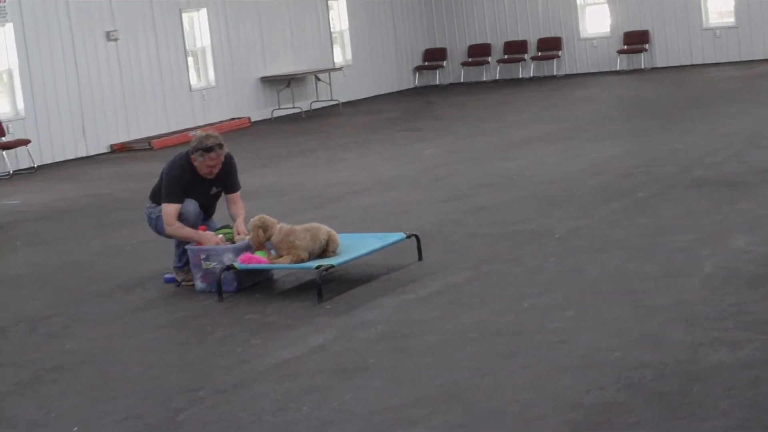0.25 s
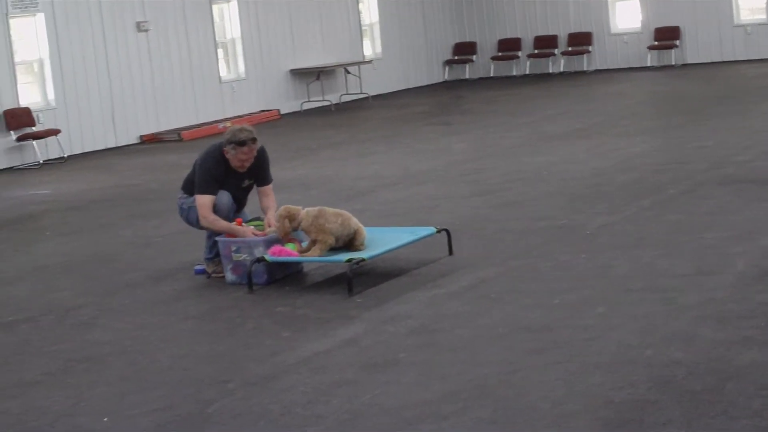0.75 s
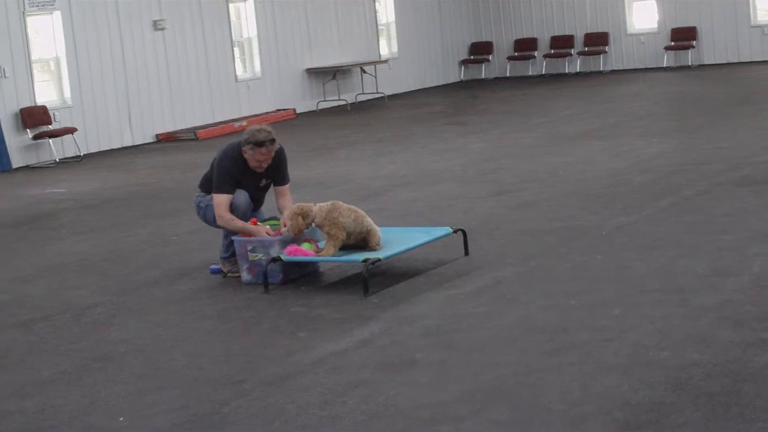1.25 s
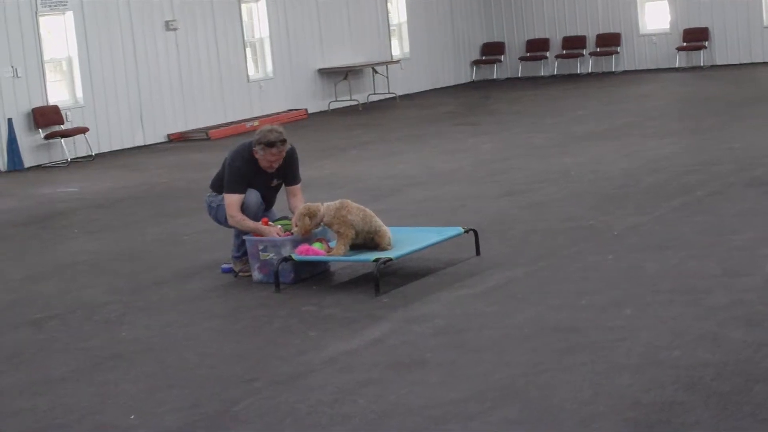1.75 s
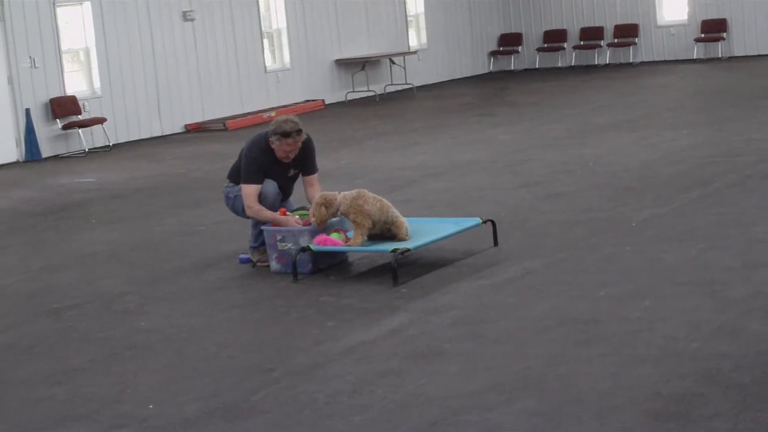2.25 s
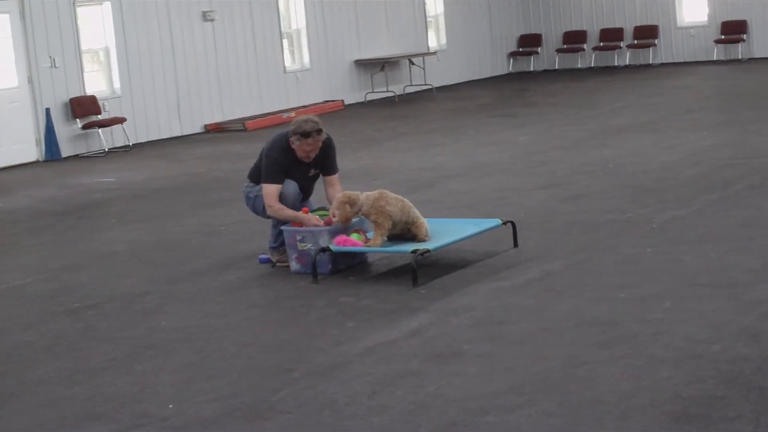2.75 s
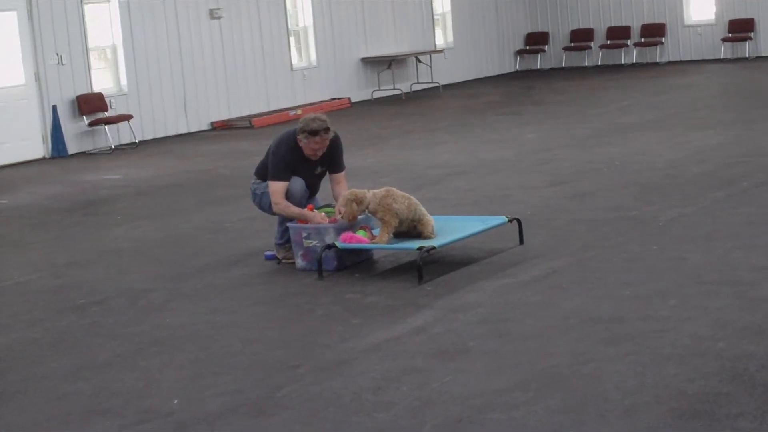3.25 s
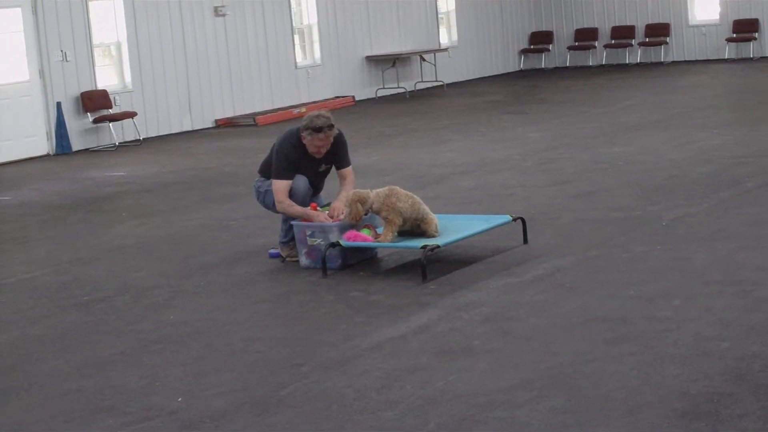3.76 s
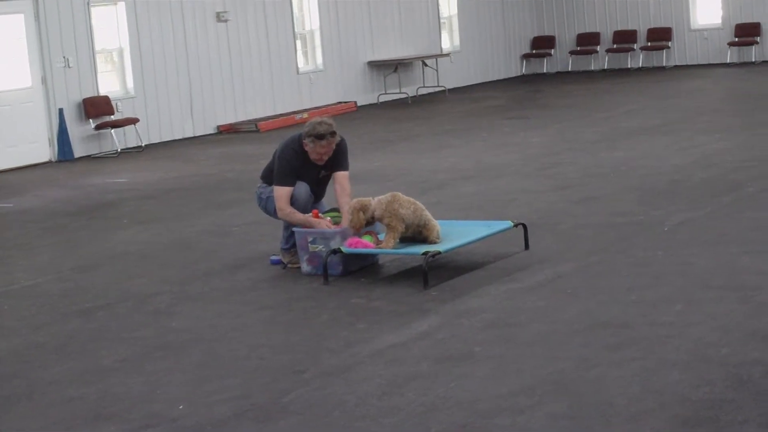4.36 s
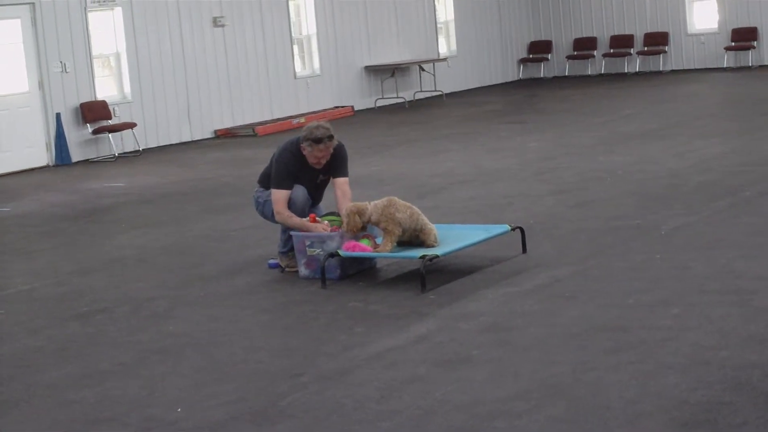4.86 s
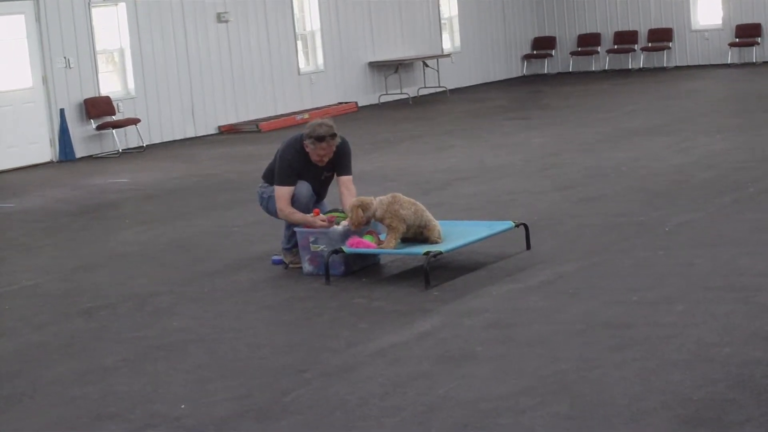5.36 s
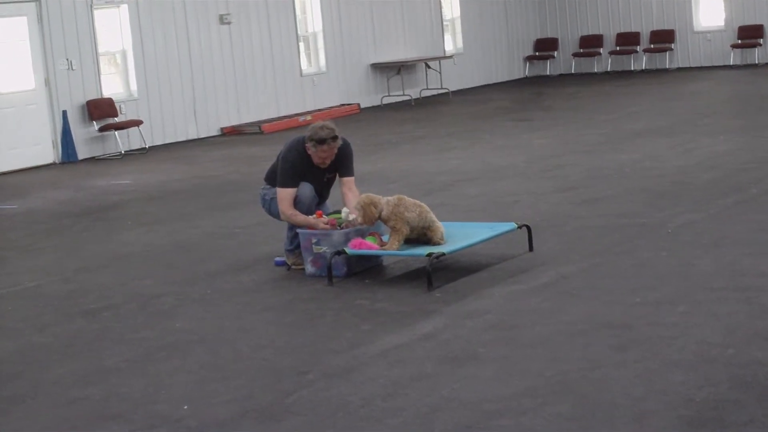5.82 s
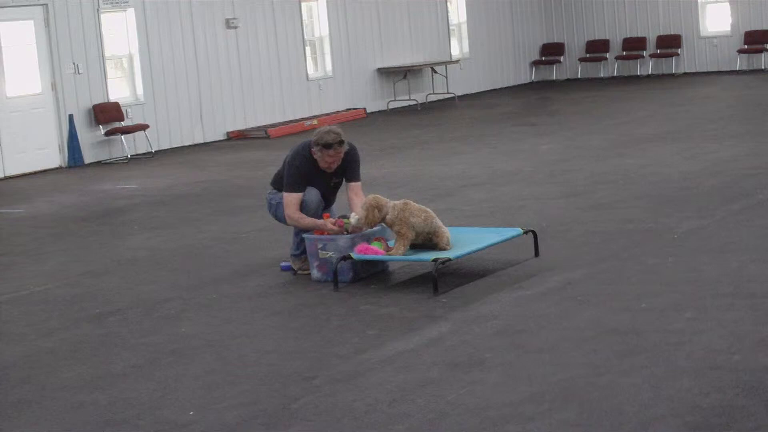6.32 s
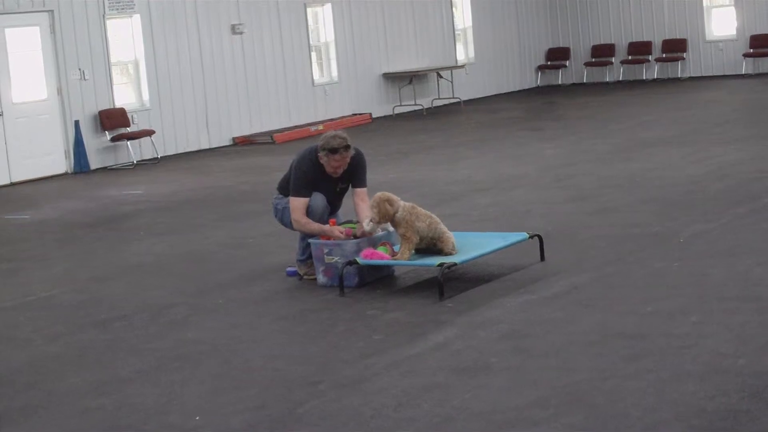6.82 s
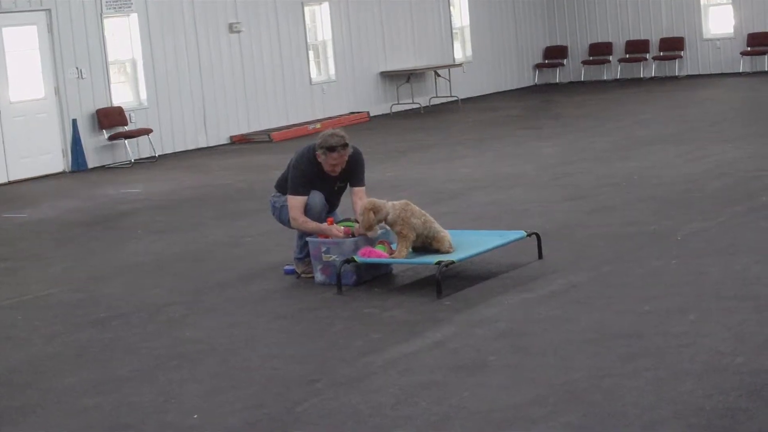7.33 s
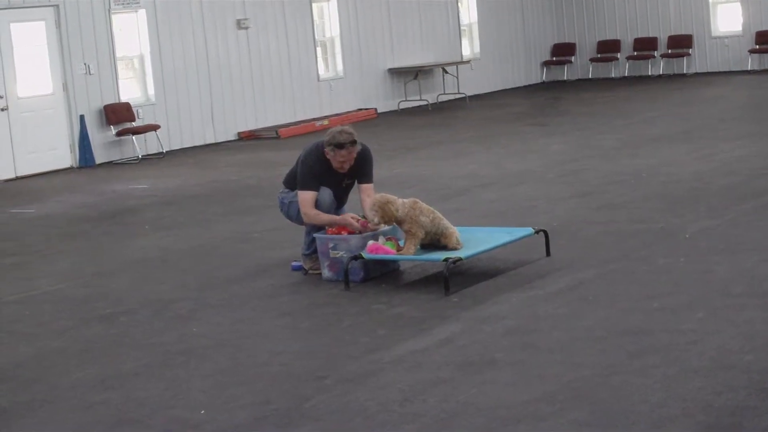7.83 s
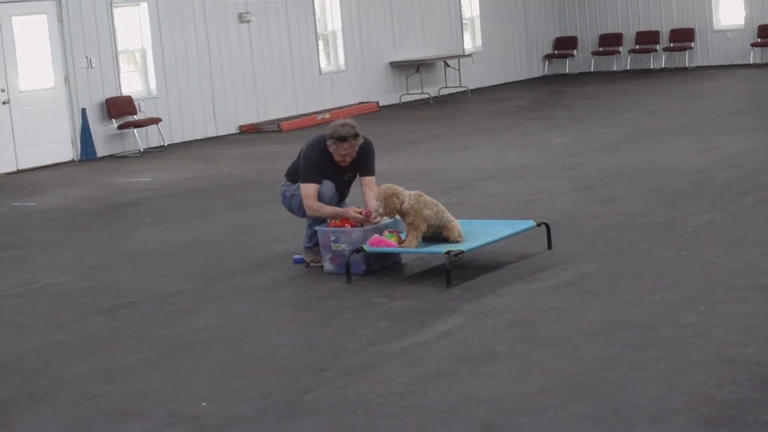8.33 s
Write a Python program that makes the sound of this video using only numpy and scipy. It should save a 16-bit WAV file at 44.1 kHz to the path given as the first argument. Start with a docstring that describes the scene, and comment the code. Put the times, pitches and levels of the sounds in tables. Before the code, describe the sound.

A dog's squeaky toy is squeezed irregularly in an echoing hall. The tail of an earlier squeak opens the scene; weak squeezes only hiss, while hard ones chirp sharply and drop in pitch. A tight group comes in the middle and two more near the end. Muted knocks, cloth rubs, one close tiny click and very faint distant whooshes sit over steady ventilation hum, heard from several metres away.

```python
"""Short reedy squeaks from a rubber toy ring in a large, bare hall, some metres from the microphone.
Hard squeezes make its reed sing harmonics in arches of pitch; soft ones only puff coloured noise,
and faint gliding tones whistle as the toy refills. Shuffles, hollow knocks and one close click join in.
The hall adds early echoes and a long noise tail; whooshes pass far off as gliding bands of noise.
Under it all lie steady low tones of mains and fans, with ventilation noise and equipment hiss."""
import sys
import numpy as np
from scipy import signal
from scipy.fft import rfft, irfft, next_fast_len
from scipy.io import wavfile
from scipy.ndimage import map_coordinates

SR = 44100
rng = np.random.default_rng(int(sys.argv[2]) if len(sys.argv) > 2 else 0)


def log_audio(samples):
    """Write samples as a 16-bit WAV file to the path given in sys.argv[1]."""
    # one column per channel
    frames = np.atleast_2d(samples).T
    # limit to full scale, then quantise
    limited = np.clip(frames, -1, 1)
    pcm = np.round(limited * 32767).astype(np.int16)
    wavfile.write(sys.argv[1], SR, pcm)


N = 378554
LEAD = SR // 4  # samples before time zero, so that an earlier squeak still rings in the hall
TIME = np.arange(-LEAD, N) / SR
TOP_HZ = 15280  # upper band limit


def amp(db):
    """Gain of a level in dB."""
    return 10 ** (np.asarray(db) / 20)


def unit(x):
    """x brought to rms 1."""
    return x / np.sqrt(np.mean(x ** 2) + 1e-20)


def along(points, hz):
    """Values between (Hz, value) points, read along a log frequency axis."""
    point_hz, values = np.transpose(points)
    return np.interp(np.log(hz + 1), np.log(point_hz + 1), values)


def stroke(start, length, rise, fall):
    """Samples that an event spans, the time since its start and its soft ends."""
    at = slice(*np.searchsorted(TIME, [start, start + length]))
    t = TIME[at] - start
    ends = np.clip(t / rise, 0, 1) * np.clip((length - t) / fall, 0, 1)
    return at, t, ends


def arch(t, crest, length, climb, sag, power=2):
    """0 at the crest, climb lower at the start and sag lower at the end."""
    before = np.clip(1 - t / max(crest, 1e-3), 0, 1)
    after = np.clip((t - crest) / (length - crest), 0, 1)
    return -climb * before ** 2 - sag * after ** power


def phase(hz):
    """Phase in radians of a tone whose pitch moves."""
    return 2 * np.pi * np.cumsum(hz) / SR


def wobble(rate):
    """A smooth random curve, rate knots a second."""
    n = len(TIME)
    knots = rng.standard_normal(int(n * rate / SR) + 4)
    return map_coordinates(knots, [np.arange(n) * rate / SR])


def filtered(x, response):
    """x times a complex response of frequency."""
    m = next_fast_len(x.shape[-1] + SR // 2)
    spectrum = rfft(x, m) * response(np.fft.rfftfreq(m, 1 / SR))
    return irfft(spectrum, m)[..., :x.shape[-1]]


def noise(spectrum):
    """Coloured noise of rms 1."""
    white = rng.standard_normal(len(TIME))
    return unit(filtered(white, lambda hz: amp(along(spectrum, hz))))


# Low tones of fans and mains: (pitch_hz, level_db rms)
HUM_TONES = [(18.5, -62.5), (55.5, -89), (59.2, -57), (118.4, -68.5), (240, -85.5), (300, -78.5),
             (360, -80.5), (480, -111), (600, -83.5), (720, -88), (960, -85), (1200, -89)]
# Colour of ventilation noise and equipment hiss: (freq_hz, relative_level_db per Hz)
AIR_COLOUR = [(5, -7.5), (20, -8), (33, -10), (50, -4), (65, -14.5), (110, -12.5), (300, -25.5),
              (600, -29.5), (940, -33), (1400, -35.5), (5000, -44.5), (13000, -52), (14000, -58),
              (15000, -72)]
AIR_DB = -59.5  # rms


def background():
    """Steady low tones of fans and mains, wavering slowly in level and phase, over air noise."""
    hum = np.zeros(len(TIME))
    for hz, db in HUM_TONES:
        level = np.sqrt(2) * amp(db + wobble(3.077))
        hum += level * np.sin(2 * np.pi * hz * TIME + 0.44 * wobble(2.0))
    return hum + amp(AIR_DB + 0.2 * wobble(3.3)) * noise(AIR_COLOUR)


# Hard squeezes, one row per squeak: (start_s, length_s, crest_s after the start (negative: falling throughout),
# crest_hz, climb_hz up to the crest, last_hz, level_db, swell_db over the length,
# body_hz main resonance in the grip, body_lift_db, low_partials_db, floor_lag_s)
SQUEAKS_PLAYED = [ (-.12, .1, 0.034, 1560, 53.5, 1146, -40.5, 4.5, 5900, 3, -2, .00328),
                  (1.547, .074, -.05, 1586, 0, 1150, -35.5, -5.5, 5950, .5, -1.5, 0.0034),
                  (2.827, 0.077, -0.013, 1413, 0, 1127, -35, -4, 5700, 1.5, 0, 0.0025),
                  (3.03, 0.091, 0.023, 1467, 103.5, 1157, -36, 0, 5880, 1.5, -.5, 0.0022),
                  (3.257, 0.076, 0.021, 1386, 29.5, 1111, -38.5, 1, 5520, 2.5, 0, .0022),
                  (3.487, .09, .02, 1449, 95.5, 1162, -37, -3.5, 5600, 2.5, 1.5, 0.0033),
                  (5.077, .116, .052, 1491, 154.5, 1191, -37, 1.5, 5620, 2, -1, .0041),
                  (7.077, .142, .058, 1442, 133, 1103, -34, -2, 5440, 2, -0.5, 0.0053),
                  (7.468, .1, 0.032, 1336, 49, 1120, -36.5, -.5, 5600, 3.5, -1, .003)]
# Colour of the squeaker tube: (freq_hz, gain_db)
TUBE_COLOUR = [(1100, -8), (1450, -13.5), (2300, -14.5), (2900, -12.5), (3600, -9.5), (4400, -6),
               (5000, -4), (5800, -2), (6800, -5.5), (8600, -10), (10500, -16), (12500, -16.5),
               (14000, -30.5), (15300, -46)]
SAG_POWER = 2.05  # the pitch sags ever faster after the crest, down to where the reed stalls
# each partial wavers in level, as sound reaching the microphone by several paths adds and cancels;
# imitated by a random curve for each partial, rate per s
SHIMMER_DB, SHIMMER_RATE = 1.8, 60
FADE_S, FADE_DB = 0.025, -7.5  # the reed weakens just before it stalls
FLOOR_DB = -6  # bounce off the hard floor


def squeaks():
    """The reed chops air once a cycle: harmonics weighted by tube and grip; also their floor bounce."""
    out, bounce = np.zeros(len(TIME)), np.zeros(len(TIME))
    k = np.arange(1, 14)[:, None]  # partial numbers
    flutter = 1 + 0.00061 * wobble(300)
    rush = noise(TUBE_COLOUR)
    shimmer = np.array([wobble(SHIMMER_RATE) for _ in k])
    for (start, length, crest, crest_hz, climb_hz, last_hz, db, swell_db,
         body_hz, lift_db, low_db, lag) in SQUEAKS_PLAYED:
        at, t, ends = stroke(start, length, rise=0.001, fall=0.002)
        hz = crest_hz + arch(t, crest, length, climb_hz, crest_hz - last_hz, SAG_POWER)
        hz = hz * flutter[at]
        fade_db = FADE_DB * np.clip(1 - (length - t) / FADE_S, 0, 1)
        gain = ends * amp(db + swell_db * t / length + fade_db)
        colour_db = lift_db * np.exp(-((k * hz - body_hz) / 600) ** 2) + low_db * (k <= 3)
        colour_db = colour_db - 1.1 * (k % 2) * (k > 1)  # the reed's beat favours even partials
        colour_db = colour_db + SHIMMER_DB * shimmer[:, at]
        weight = amp(along(TUBE_COLOUR, k * hz) + colour_db) * (k * hz < TOP_HZ)
        weight[0] *= 1 - np.exp(-t / 0.008)  # the fundamental speaks last
        tone = np.sum(weight * np.sin(k * phase(hz) + 0.36 * k * k), axis=0)
        out[at] += gain * (tone + amp(-30.0) * rush[at])
        bounce[at.start + round(lag * SR):][:len(hz)] += amp(FLOOR_DB) * out[at]
    return out, bounce


# Far whooshes: (start_s, length_s, first_centre_hz, last_centre_hz, loudest_db)
WHOOSHES_PLAYED = [(.75, 0.53, 2130, 1180, -71.5), (5.85, 0.49, 1790, 2010, -77),
                   (8.35, 0.41, 1508, 1550, -69.5)]
WHOOSH_CREST, WHOOSH_SWELL_DB = 0.81, 15  # loudest at this share of the length; swell and fade


def whooshes():
    """A faint band of noise whose centre glides in pitch."""
    out = np.zeros(len(TIME))
    band = wobble(300) + 1j * wobble(300)  # slow complex noise, shifted up to the centre
    for start, length, first_hz, last_hz, db in WHOOSHES_PLAYED:
        at, t, ends = stroke(start, length, rise=0.05, fall=0.04)
        hz = first_hz + (last_hz - first_hz) * t / length
        swell_db = arch(t, WHOOSH_CREST * length, length, WHOOSH_SWELL_DB, WHOOSH_SWELL_DB)
        out[at] += ends * amp(db + swell_db) * np.real(band[at] * np.exp(1j * phase(hz)))
    return out


# Soft squeezes: (start_s, length_s, level_db)
PUFFS_PLAYED = [(.955, 0.12, -72), (1.11, .1, -79), (1.241, .11, -70.5), (2.03, .09, -73),
                (2.294, 0.12, -74), (2.54, .115, -70.5), (4.77, 0.13, -74), (6.792, 0.11, -72.5)]
# Colour of the escaping air: (freq_hz, relative_level_db per Hz)
JET_COLOUR = [(1760, -35), (3000, -12), (3570, -17), (5690, 2.5), (6960, -5), (7810, -1), (8580, -7.5),
              (11900, -6.5), (15000, -14)]
REST_S = 1  # after a longer gap between squeak starts the toy is full and hisses before the reed speaks
LEAD_IN_S, LEAD_IN_DB, LEAD_IN_SWELL_DB = 0.043, -56, 33  # length, final level and growth of that hiss


def puffs():
    """Too little pressure for the reed: only a hiss of air, also just before squeaks that follow a rest."""
    out, jet = np.zeros(len(TIME)), noise(JET_COLOUR)
    for start, length, db in PUFFS_PLAYED:
        at, t, ends = stroke(start, length, rise=0.017, fall=0.038)
        out[at] += ends * amp(db) * jet[at]
    squeak_starts = np.array([row[0] for row in SQUEAKS_PLAYED])
    for start in squeak_starts[1:][np.diff(squeak_starts) > REST_S]:
        at, t, ends = stroke(start - LEAD_IN_S, LEAD_IN_S, rise=0.01, fall=0.012)
        out[at] += ends * amp(LEAD_IN_DB - LEAD_IN_SWELL_DB * (1 - t / LEAD_IN_S)) * jet[at]
    return out


# Shuffles of hands and cloth: (start_s, hold_s, level_db)
SHUFFLES_PLAYED = [(1.069, 0.024, -63), (4.23, .01, -68), (7.58, 0.049, -60)]
# Colour of the rubbing: (freq_hz, relative_level_db per Hz)
CLOTH_COLOUR = [(100, -44), (200, -9), (330, -5), (480, 0), (730, 3), (1000, -2.5), (1700, -12),
                (2600, -12), (5000, -64)]
SHUFFLE_T60_S, SHUFFLE_TAIL_S = 0.57, 0.27  # decay after the hold, and how long it lasts


def shuffles():
    """Rubbing noise, grainy from rapid random changes of level."""
    out = np.zeros(len(TIME))
    rub = unit(noise(CLOTH_COLOUR) * amp(6.1 * wobble(90)))
    for start, hold, db in SHUFFLES_PLAYED:
        at, t, ends = stroke(start, hold + SHUFFLE_TAIL_S, rise=0.0028, fall=0.018)
        decay_db = -60 * np.clip(t - hold, 0, None) / SHUFFLE_T60_S
        out[at] += ends * amp(db + decay_db) * rub[at]
    return out


# Bumps: (start_s, level_db, brightness_db added to the modes above 600 Hz)
KNOCKS_PLAYED = [(1.076, -57, 5), (2.221, -48.5, -3), (2.386, -52, -1.5), (4.231, -46, -15),
                 (7.585, -59, 8), (7.642, -59, 5), (7.932, -57.5, -2)]
# Modes of the hollow thing that is knocked: (pitch_hz, relative_level_db, t60_s)
BOX_MODES = [(187, -2.5, 0.085), (254, 3, 0.046), (360, -7.5, 0.048), (806, -3, 0.026), (2010, -12, 0.006)]


def knocks():
    """Bumps on something hollow: decaying modes, the upper ones stronger in brighter knocks."""
    out, t = np.zeros(len(TIME)), np.arange(SR // 5) / SR
    for start, db, bright_db in KNOCKS_PLAYED:
        ring = np.zeros(len(t))
        for hz, mode_db, t60 in BOX_MODES:
            level_db = mode_db + (hz > 600) * bright_db + rng.normal(0, 0.86)
            ring += amp(level_db - 60 * t / t60) * np.sin(2 * np.pi * hz * t)
        out[LEAD + round(start * SR):][:len(t)] += amp(db) * ring
    return out


# Refill whistles: (start_s, length_s, lowest_hz, climb_hz to the crest, level_db)
WHISTLES_PLAYED = [(1.118, 0.065, 5330, 476, -69), (1.413, .09, 5650, 150, -76),
                   (2.451, 0.064, 5330, 480, -70), (2.689, .087, 5300, 643, -68.5),
                   (6.979, 0.048, 5230, 50, -73)]
WHISTLE_CREST = 0.35  # share of the length at which the pitch is highest


def whistles():
    """An unsteady edge tone while air flows back into the toy."""
    out = np.zeros(len(TIME))
    waver, drift = amp(2.3 * wobble(120)), 1 + 0.004 * wobble(150)  # of level and of pitch
    for start, length, low_hz, climb_hz, db in WHISTLES_PLAYED:
        at, t, ends = stroke(start, length, rise=0.0071, fall=0.014)
        bend = arch(t, WHISTLE_CREST * length, length, climb_hz, climb_hz, power=1.4)
        hz = low_hz + climb_hz + bend
        out[at] += ends * amp(db) * waver[at] * np.sin(phase(hz * drift[at]))
    return out


# Modes of a small click beside the microphone: (pitch_hz, level_db, t60_s)
TICK_MODES = [(1590, -55, 0.024), (1940, -46, 0.012)]
TICK_S = 1.4218  # start


def tick():
    """Two short decaying modes, too near and small to wake the hall."""
    t = np.clip(TIME - TICK_S, 0, None)
    ring = sum(amp(db - 60 * t / t60) * np.sin(2 * np.pi * hz * t) for hz, db, t60 in TICK_MODES)
    return ring * (1 - np.exp(-t / 0.0006))


# Decay of the hall: (freq_hz, t60_s)
HALL_DECAY = [(200, 0.81), (900, 2.3), (2400, 2.73), (6000, 1.72), (9000, 1.026), (14000, 0.67)]
# Early wall echoes: (delay_s, level_db)
WALL_ECHOES = [(.007, -18.5), (.009, -14.5), (.015, -7.5), (0.0174, -29), (0.033, -14.5), (0.044, -13)]
# Hands and body shade the way to the microphone, so the near paths carry less bass
# than the hall gets: (freq_hz, gain_db)
BODY_SHADE = [(200, -5), (1400, -3), (2800, 0.5), (4300, -0.5), (5700, 3), (7200, -0.5), (9000, 3),
              (12500, 2)]


def hall(x, bounce=0, tail_db=0):
    """Direct sound, early walls and a diffuse tail in which each frequency dies at its own speed."""
    hz, t, grains = signal.stft(rng.standard_normal(3 * SR), SR, nperseg=256)
    swell = 1 - np.exp(-t / 0.013)  # echoes take time to fill the hall
    decay = amp(-60 * t / along(HALL_DECAY, hz)[:, None])
    tail = signal.istft(grains * swell * decay, SR, nperseg=256)[1]
    far = signal.fftconvolve(x, amp(tail_db) * tail / np.linalg.norm(tail))[:len(x)]

    def echoes(f):
        return sum(amp(db) * np.exp(-2j * np.pi * f * delay) for delay, db in WALL_ECHOES)

    near = x + bounce + filtered(x, echoes)
    return far + filtered(near, lambda f: amp(along(BODY_SHADE, f)))


def scene():
    """The toy and its handling in the hall, over the steady background."""
    toy = hall(*squeaks(), tail_db=-0.5) + hall(puffs(), tail_db=0.5) + hall(whistles(), tail_db=-7)
    handling = hall(knocks(), tail_db=-6.5) + hall(shuffles(), tail_db=-2.5) + tick()
    return (toy + handling + whooshes() + background())[None, LEAD:]


# Dips of the microphone housing: (centre_hz, width_hz, depth from 0 to 1)
HOUSING_DIPS = [(7790, 1030, 1), (11100, 140, 1)]


def record(dry):
    """Two resonant dips of the microphone housing, then the band limit."""
    def response(f):
        dips = 1
        for centre, width, depth in HOUSING_DIPS:
            resonance = 1j * f * width / (centre * centre - f * f + 1j * f * width)
            dips = dips * (1 - np.clip(depth, 0, 1) * resonance)
        return dips * (f < TOP_HZ)

    return filtered(dry, response)


dry = scene()
out = record(dry)
log_audio(out)
```